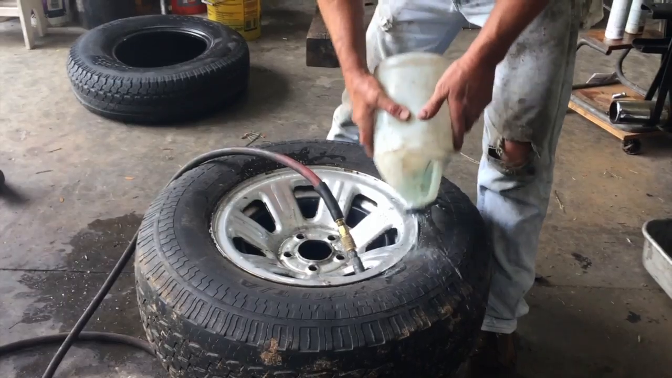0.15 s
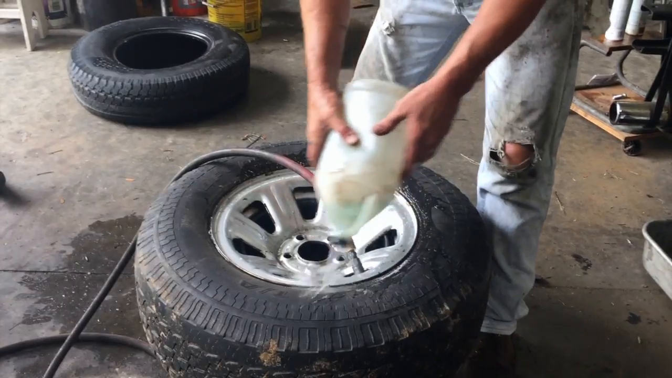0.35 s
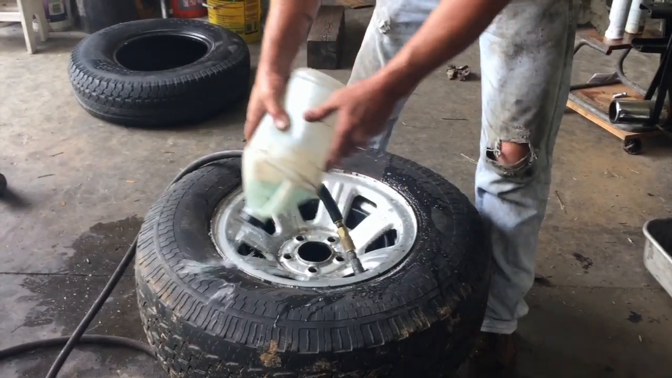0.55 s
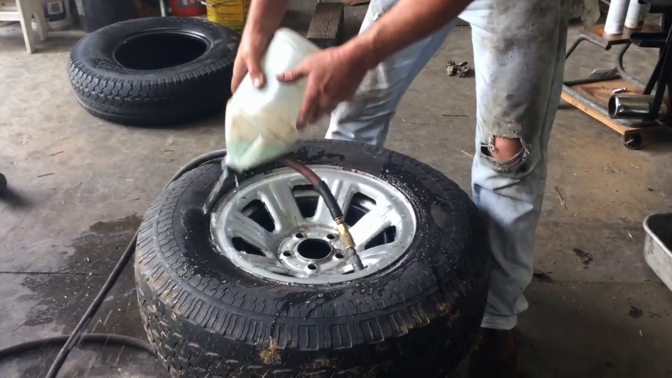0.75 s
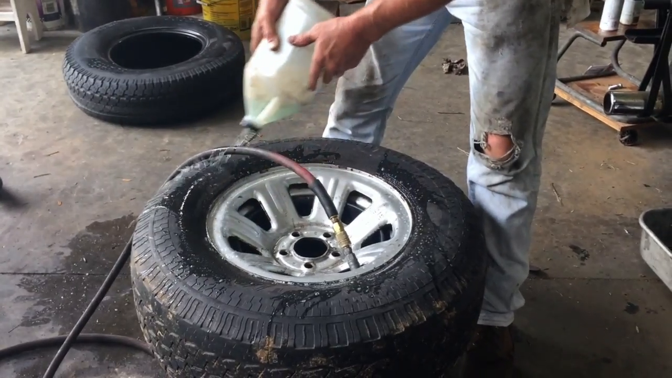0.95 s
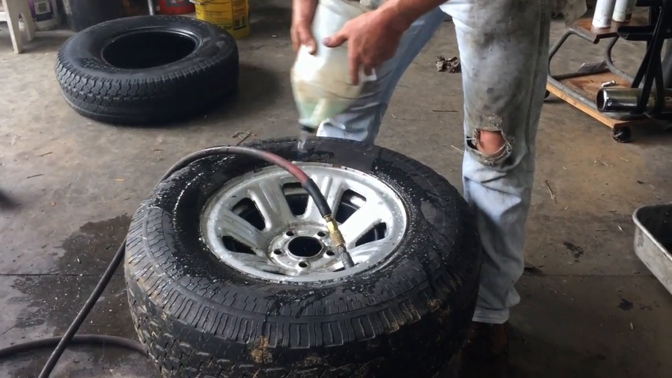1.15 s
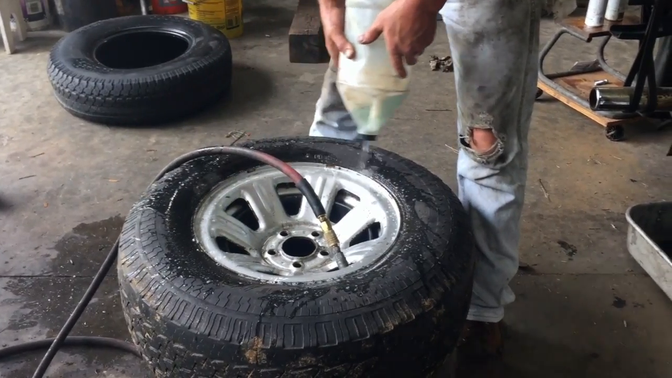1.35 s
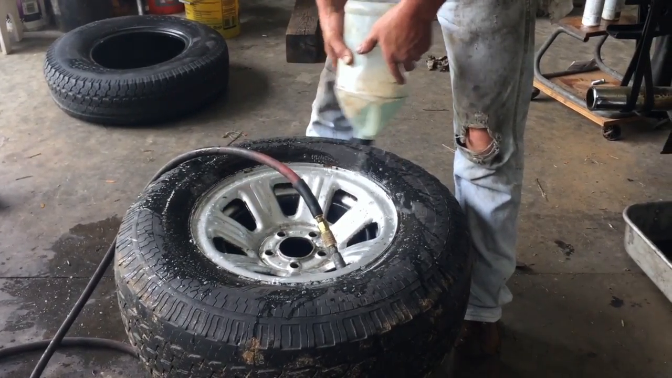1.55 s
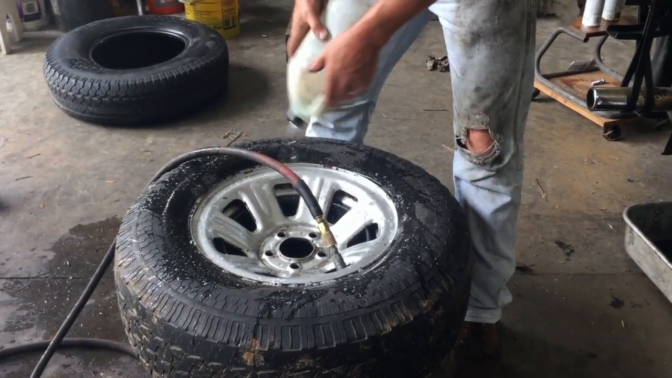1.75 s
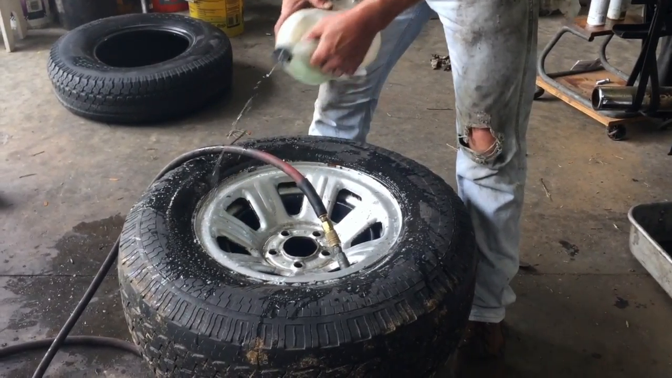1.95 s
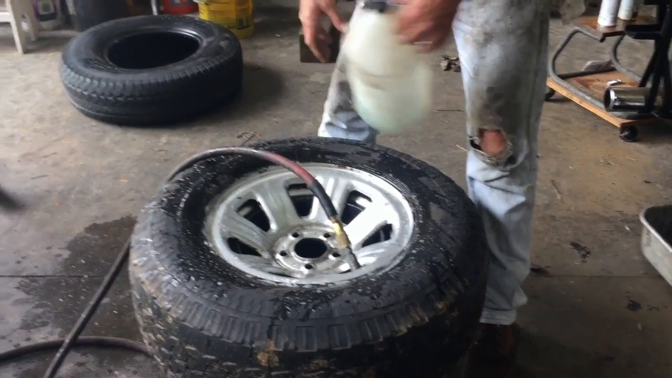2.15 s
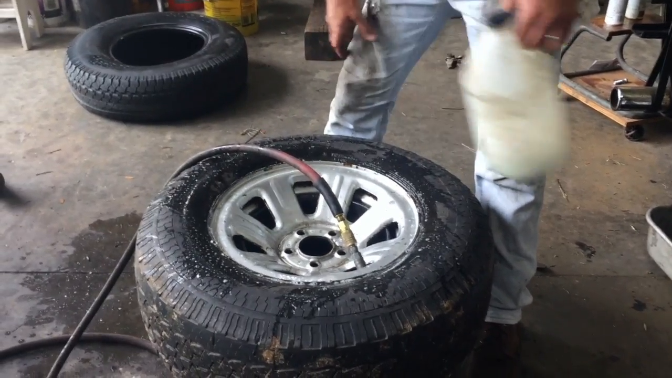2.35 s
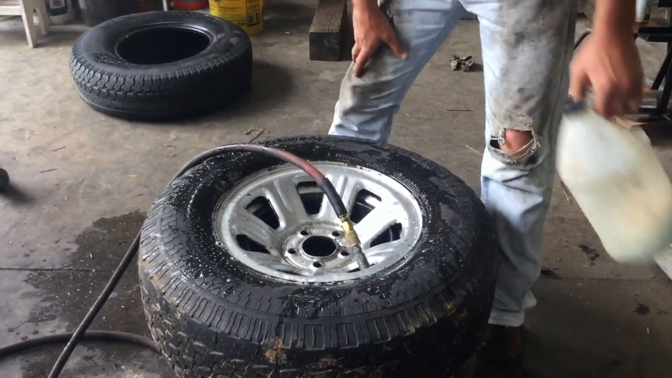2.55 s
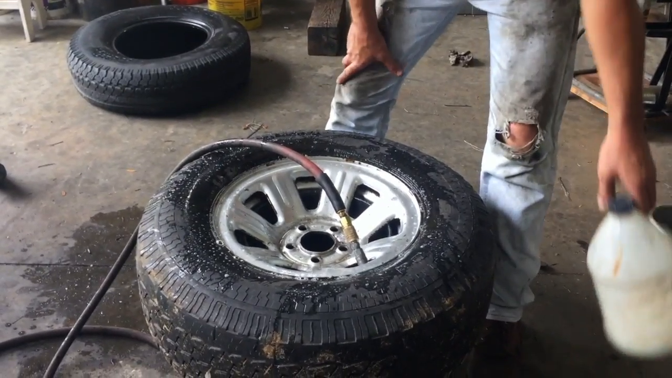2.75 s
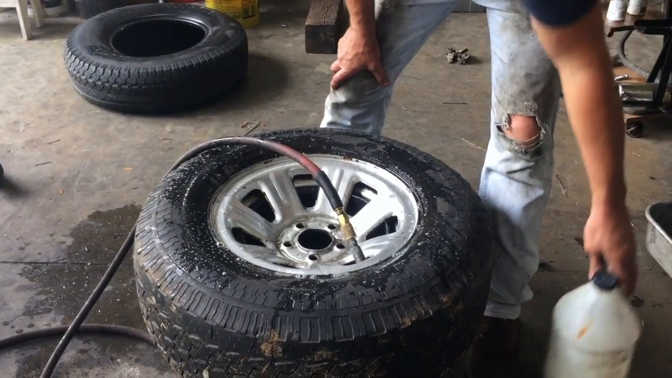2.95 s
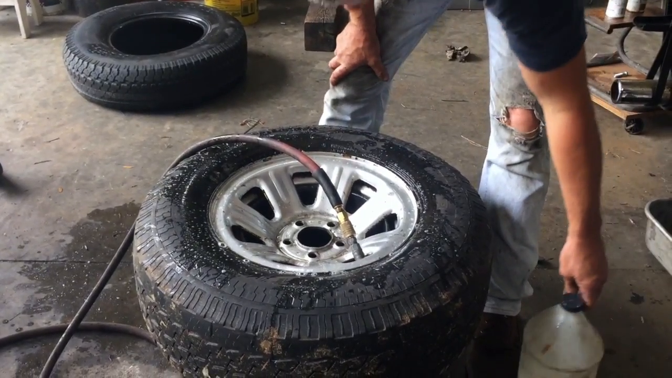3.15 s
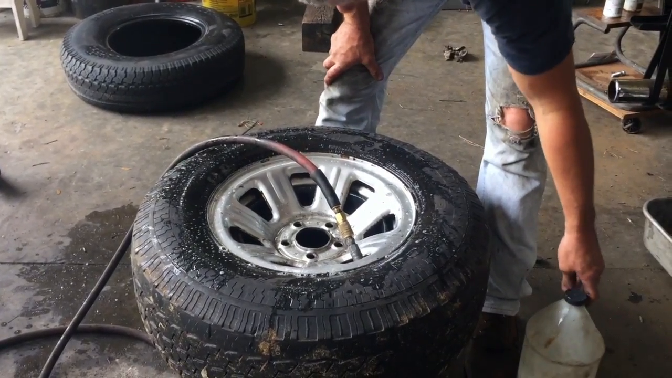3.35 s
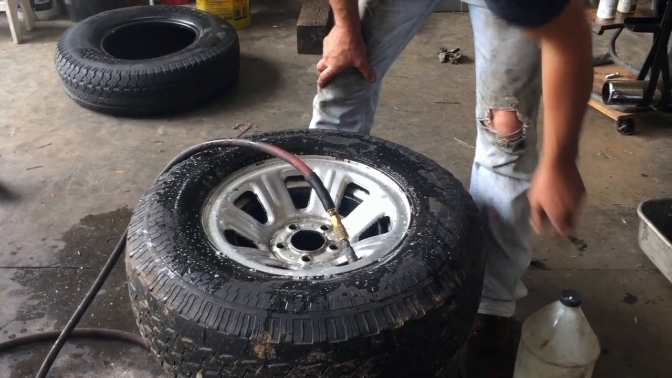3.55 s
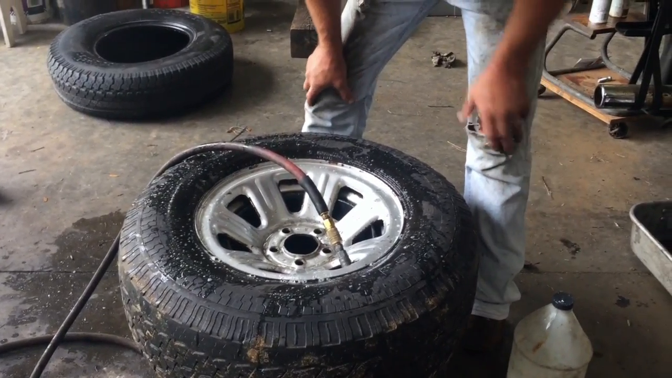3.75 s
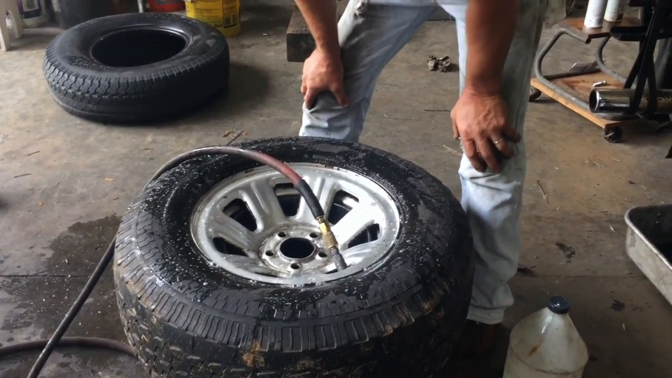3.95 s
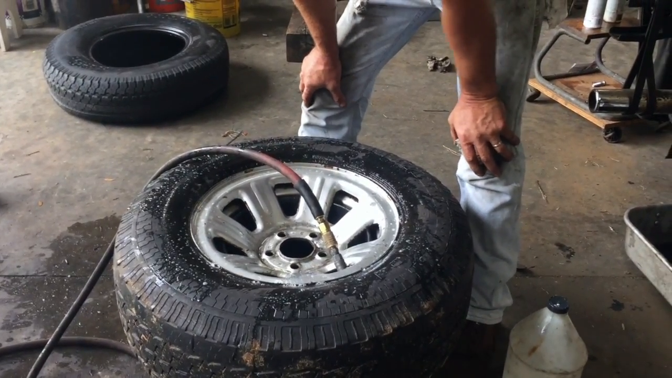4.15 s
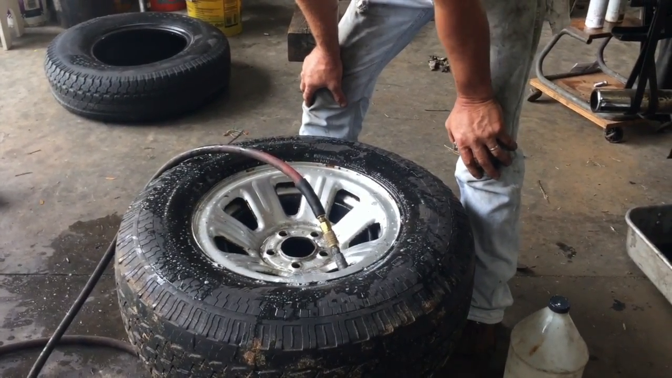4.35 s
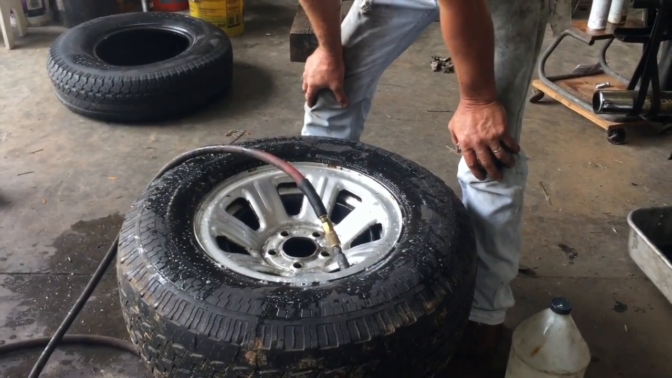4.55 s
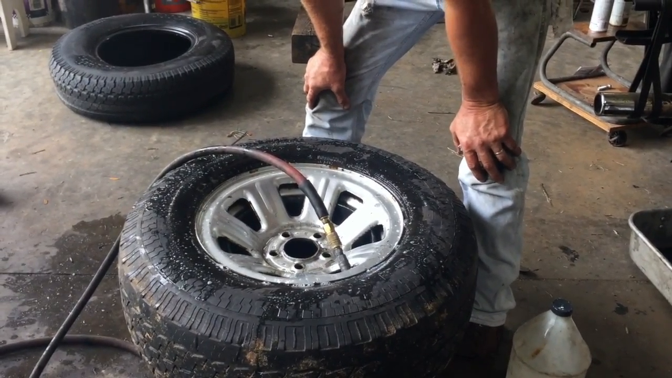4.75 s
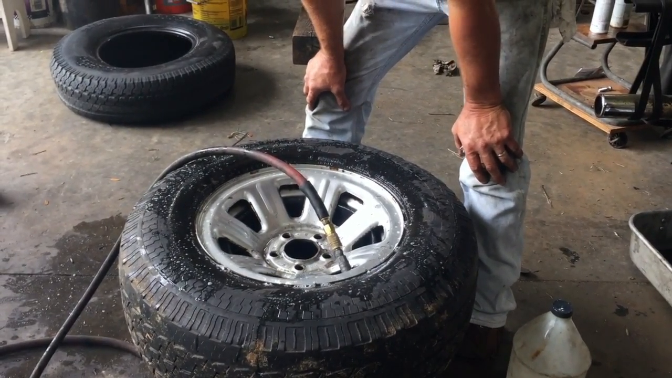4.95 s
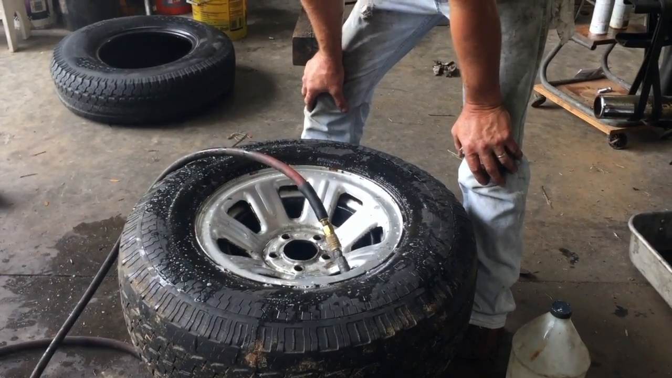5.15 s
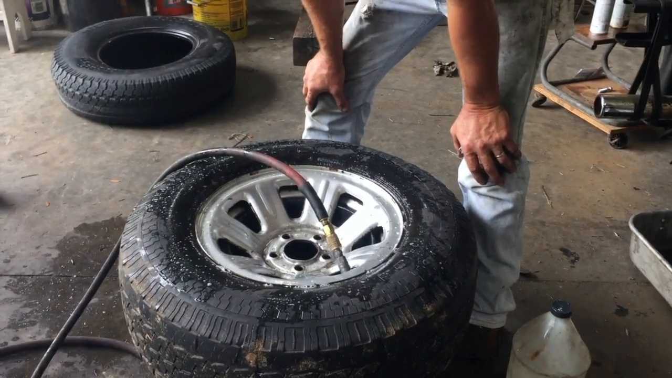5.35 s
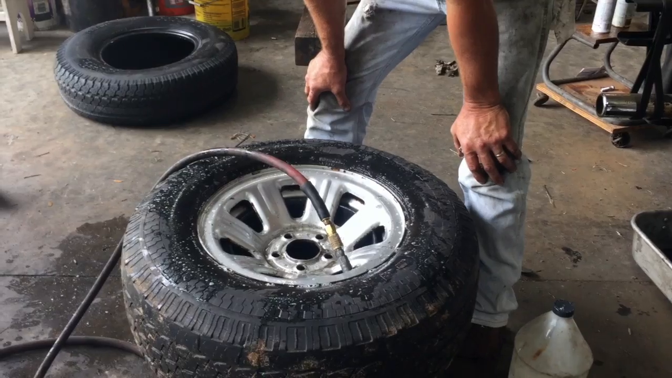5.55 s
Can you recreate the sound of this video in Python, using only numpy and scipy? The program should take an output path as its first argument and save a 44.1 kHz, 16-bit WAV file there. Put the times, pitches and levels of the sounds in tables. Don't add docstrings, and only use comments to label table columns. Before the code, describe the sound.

A dense, bright hiss of compressed air runs without pause for about 5.7 seconds, strong in the high treble and laced with thin, flickering metallic singing around 3 and 4 kHz. A breathy whistle near 7 kHz slides slowly down to about 6.5 kHz, and the level eases slightly. Beneath lie faint machinery hum and soft distant thuds. From 0 to 2.1 s, small wet sloshes of soapy water tick in a plastic jug, with a dull, hollow gulp at 0.77 s. At 2.2 s the jug wall buckles and springs back with a quick double pop and watery splash. At 3.28 s it lands on concrete: a hollow low knock with a sharp rim click, then a scrape, small rocking taps and settling until 3.5 s. Around 3.9 s a hand brushes and pats cloth; faint rustles and shuffles continue to the end. Short, dull room reverberation; one close microphone, practically mono.

```python
import sys
import numpy as np
from scipy import signal
from scipy.fft import rfft, irfft
from scipy.io import wavfile

SR = 44100
rng = np.random.default_rng(int(sys.argv[2]) if len(sys.argv) > 2 else 0)


def unload_wav(signal):
    wavfile.write(
        sys.argv[1],
        SR,
        np.round(np.clip(np.atleast_2d(signal).T, -1, 1) * 32767).astype(np.int16),
    )


def magnitude_from_level(level_db):
    exponent = np.asarray(level_db, float) / 20
    return 10 ** exponent


N = 251370

# f/Hz, density/dB per Hz
HUM_COLOUR = [(22, -25), (40, 0), (60, -9), (110, -2.5), (200, -1), (280, -3.5), (400, -4.5), (700, -13),
              (800, -32), (1300, -6), (2500, -57)]
# f/Hz, width/Hz, level over hum/dB
DRONES = [(60.7, 17.4, 13.8), (680, 9.1, 4.9), (983, 16, 8.9)]
# t/s, floor rumble level/dB, duct tone level/dB
THUDS = [(0.0, -62, -64), (0.24, -62.5, -70), (0.78, -61, -75), (1.05, -70, -79), (1.4, -71, -62),
         (1.6, -70, -64), (1.95, -73, -64), (2.1, -62.5, -75), (2.2, -59.5, -53), (2.28, -61, -68),
         (3.03, -83, -60.5), (3.3, -48.5, -58), (3.42, -70, -55.5), (3.52, -69, -63), (3.87, -62, -57),
         (4.03, -71, -60.5), (4.25, -76, -73), (4.41, -94, -66), (4.679, -71, -56.5), (4.75, -82, -59),
         (5.11, -85, -64), (5.36, -66.5, -87), (5.55, -64, -62), (5.68, -73, -73)]

# start t/s, level/dB, low f/Hz, high f/Hz, length/ms
SCUFFS = [(0.001, -63, 90, 396, 60), (0.76, -59, 910, 2200, 49), (2.085, -60, 94, 395, 200),
          (2.2, -60, 910, 2010, 113), (3.25, -54.5, 200, 1500, 17), (3.293, -56.5, 300, 3000, 160),
          (3.304, -57, 850, 2400, 12), (3.33, -47, 800, 2500, 21), (3.364, -48, 400, 2300, 10),
          (3.372, -62, 500, 2400, 9.5), (3.392, -63, 900, 2800, 12), (3.417, -51.5, 700, 2000, 16.5),
          (3.428, -50.5, 1000, 2500, 24), (3.835, -54.5, 400, 2200, 105), (3.893, -49, 2050, 2930, 60),
          (3.905, -56, 300, 1800, 53), (4.22, -67.5, 300, 1400, 88), (4.69, -60, 300, 1700, 22),
          (4.72, -66, 300, 1400, 33), (5.045, -64, 300, 1200, 30), (5.066, -64, 300, 1600, 24),
          (5.46, -65, 300, 1600, 16), (2.45, -63.5, 400, 1100, 62), (2.93, -66.5, 400, 1700, 150),
          (5.43, -73, 200, 1000, 74)]
# t/s, peak level/dB, centre f/Hz, t60/s
TICKS = [(3.862, -59, 704, 0.057), (3.865, -69, 265, .1), (3.88, -55, 450, 0.061),
         (3.92, -47, 2650, 0.06), (4.004, -49, 340, 0.036), (4.275, -61, 1260, 0.057),
         (4.335, -60, 466, .09), (4.65, -64, 756, .1), (4.695, -59, 860, 0.045), (4.728, -63, 800, .05),
         (5.014, -64, 684, 0.06), (5.02, -60, 308, 0.12), (5.03, -57, 1700, .06), (5.07, -58, 1450, .06),
         (5.204, -58.5, 820, .06), (5.235, -62, 700, .05), (5.318, -58, 660, 0.039),
         (5.32, -62, 1160, .06), (5.345, -65, 1340, .06), (5.44, -59, 620, 0.064),
         (5.46, -53, 600, 0.048), (0.068, -52.5, 205, 0.22), (0.873, -51, 170, 0.087),
         (0.99, -61, 326, 0.22)]
# t/s, peak level/dB, centre f/Hz, t60/s
SLOSH = [(0.11, -44.5, 650, 0.05), (0.195, -59.5, 696, 0.16), (0.443, -55, 570, 0.062),
         (0.532, -60, 392, 0.15), (0.533, -54, 1680, .06), (0.705, -53, 1370, 0.13),
         (0.977, -57, 706, 0.09), (1.018, -55.5, 1320, 0.11), (1.211, -59.5, 425, 0.091),
         (1.507, -59.5, 600, 0.075), (1.629, -52, 570, 0.063), (1.901, -53.5, 510, 0.08),
         (1.924, -57.5, 1150, 0.089), (1.955, -53.5, 300, 0.083), (2.038, -53, 1650, 0.057),
         (2.077, -56.5, 1060, 0.14), (2.086, -48, 280, 0.12), (2.206, -47, 1110, 0.037),
         (2.222, -51, 1630, 0.053), (2.258, -35, 1140, 0.027), (2.296, -58, 1268, 0.11),
         (2.465, -51.5, 533, 0.054), (2.515, -59, 616, 0.077), (2.643, -60.5, 624, 0.17),
         (2.719, -62, 460, 0.099), (2.994, -59, 850, 0.075), (3.049, -54, 685, 0.051),
         (3.229, -67, 312, 0.1)]

# f/Hz, level/dB, t60/s
GULP_MODES = [(90, -6, 0.13), (151.7, -6, 0.25), (230.4, 3.5, 0.18), (300, 4, 0.06), (373, 9, 0.04),
              (470, -2, 0.04), (600, -4, 0.04), (1080, -12, .04), (1690, -3, 0.04)]
# f/Hz, level/dB, t60/s
POP_MODES = [(200, -4, 0.071), (265, -14, 0.06), (326, -5, 0.06), (416, 7.5, 0.062), (479, -11, 0.08),
             (540, -7, 0.051), (780, -17, 0.04), (984, -4.5, 0.03)]
# f/Hz, level/dB, t60/s
BACK_MODES = [(247, 5.5, 0.038), (450, -6, 0.033), (162, -16, 0.046)]
# f/Hz, level/dB, t60/s
BASE_MODES = [(81, -5, 0.24), (110, -6.5, 0.25), (155, -12, 0.11), (198, -7.5, 0.24), (265, -10, 0.055),
              (332, -9, 0.12), (398, -1, 0.024), (600, -3, 0.035), (63, -9.5, 0.35)]
# f/Hz, level/dB, t60/s
EDGE_MODES = [(850, -14, 0.11), (1033, -6.5, 0.043), (1283, 2.5, 0.034), (1376, 8.5, 0.012),
              (1700, -5, 0.012), (2200, -14, 0.011), (1500, 5.5, 0.017), (2030, -8, 0.031),
              (2440, 2, 0.0096), (2900, -7, 0.012)]
# t/s, level/dB, contact cut f/Hz
GULP_BLOWS = [
    (0.7678, -42, 1490),
    (0.779, -50, 400),
]
# t/s, level/dB, contact cut f/Hz
POP_BLOWS = [
    (2.1826, -31.5, 1210),
]
# t/s, level/dB, contact cut f/Hz
BACK_BLOWS = [
    (2.2045, -39, 700),
    (2.2085, -40, 600),
    (2.243, -48, 400),
    (2.253, -45, 400),
]
# t/s, level/dB, contact cut f/Hz
BASE_BLOWS = [
    (3.26, -37, 200),
    (3.284, -26, 900),
    (3.296, -34, 704),
    (3.365, -47, 600),
    (3.40, -59, 400),
    (3.513, -50.5, 300),
]
# t/s, level/dB, contact cut f/Hz
EDGE_TAPS = [
    (3.2833, -25, 3500),
    (3.2862, -40, 3000),
    (3.309, -42, 1600),
    (3.366, -51, 2500),
    (3.423, -52, 3000),
    (3.436, -52.5, 4000),
]

SINGING_HZ = (3043, 4262, 1362, 1508, 2320, 1908, 1695)
SINGING_REST_DB = (-68, -70, -86, -103, -72, -83, -99)
# t/s, level/dB, half length/s
LOW_FLARES = [(0.1, -64, 0.016), (0.19, -57, 0.016), (0.3, -62, .03), (0.43, -62, 0.02), (0.53, -72, .03),
              (0.72, -57, 0.022), (0.87, -58, 0.025), (1.05, -56, 0.019), (1.17, -71, 0.017),
              (1.28, -65, .03), (1.38, -61, 0.02), (1.56, -59, .025), (1.72, -59, 0.023),
              (1.84, -61, 0.042), (1.94, -58, 0.015), (2.07, -58, 0.033), (2.18, -57, .02),
              (2.3, -56, 0.025), (2.41, -63, .025), (2.54, -58, .02), (2.61, -59, 0.024),
              (2.71, -60, 0.027), (2.8, -64, 0.023), (2.97, -55, 0.017), (3.08, -65, 0.018),
              (3.17, -66, 0.013), (3.255, -51.5, 0.024), (3.5, -68, .04), (3.66, -62, .02),
              (3.73, -54.5, 0.02), (3.85, -63, .03), (3.99, -63, 0.027), (4.2, -57.5, 0.059),
              (4.38, -67, .02), (4.47, -63, .015), (4.55, -66, .03), (4.66, -56, 0.02), (4.9, -69, .03),
              (5.02, -54, 0.016), (5.12, -68, .03), (5.4, -68, 0.029), (5.55, -60, 0.027),
              (5.65, -57.5, 0.036)]
# t/s, level/dB, half length/s
HIGH_FLARES = [(0.07, -72, .04), (0.2, -58, 0.035), (0.33, -59, 0.022), (0.55, -67, .025),
               (0.77, -58, 0.046), (0.94, -73, .03), (1.1, -74, 0.054), (1.75, -74, .05),
               (2.28, -65, 0.025), (2.47, -65, 0.03), (2.66, -60, 0.018), (2.77, -61, .025),
               (2.92, -62, 0.045), (3.03, -61, 0.015), (3.17, -54.5, 0.05), (3.31, -61, .02),
               (3.45, -66, 0.035), (3.58, -60, 0.023), (3.73, -54.5, 0.031), (4.05, -87, 0.059),
               (4.17, -60.5, 0.054), (4.33, -66, .02), (4.5, -60, 0.045), (4.66, -55, 0.022),
               (4.91, -55, 0.057), (5.26, -68, .02), (5.62, -66, 0.07)]
# t/s, level/dB, half length/s
HOSE_FLARES = [(0.92, -70.5, 0.061), (1.1, -77, 0.029), (1.35, -81, 0.074), (2.2, -82, 0.24),
               (2.8, -78, 0.46)]
# t/s, level/dB, half length/s
LATE_FLARES = [(4.3, -77.5, 0.39), (4.9, -75, 0.024), (5.15, -74, 0.088), (5.5, -79, 0.18)]
# t/s, level/dB, half length/s
SPOKE_FLARES = [(0.05, -74, 0.036), (0.14, -80, 0.017), (0.28, -65, .035), (0.46, -59, .02),
                (1.0, -65, 0.03), (1.25, -67, 0.045), (1.45, -57.5, 0.042), (1.65, -58, 0.023),
                (1.92, -75, .02), (2.4, -63, 0.026), (2.84, -61, 0.033), (3.13, -61, 0.03),
                (3.42, -64, 0.028), (3.68, -68, .02), (3.92, -58.5, 0.033), (4.1, -58, 0.03),
                (4.27, -61, 0.033), (4.46, -64, 0.028), (4.56, -63, 0.04), (4.72, -58.5, 0.018),
                (5.4, -61, 0.055), (5.5, -76, .04)]
# t/s, level/dB, half length/s
HUB_FLARES = [(0.22, -72, 0.03), (3.8, -66.5, 0.035), (4.25, -77, 0.052), (4.7, -70, 0.039),
              (5.4, -69, 0.047), (5.55, -77, .05)]
# t/s, level/dB, half length/s
STEM_FLARES = [(0.3, -88, 0.027), (0.54, -69, 0.016), (0.68, -73, 0.1), (0.93, -76, .05),
               (4.85, -75, 0.045)]

# t/s, valve whistle f/Hz, level/dB
JET = [
    (0.0, 7100, -40),
    (0.49, 7070, -42),
    (1.0, 6960, -41.5),
    (3.19, 6840, -42.5),
    (4.89, 6550, -43),
    (5.7, 6460, -43),
]
# f/Hz, density/dB per Hz
JET_COLOUR = [(700, -16), (1500, -17), (2000, -7.5), (2280, -3), (2620, -4.5), (3000, -3.5), (3800, -2),
              (4850, -3), (5800, -3.5), (7600, -1), (9800, 1), (10400, -4.5), (11300, -4.5), (15700, -4)]
# f/Hz, width/Hz, level over hiss/dB
WHEEL_MODES = [(1085, 8, 6), (1507, 6, 10), (1680, 15, 9), (1803, 20, 6), (1906, 6, 9), (2030, 6, 8),
               (2196, 31, 7), (2234, 10, 9), (2320, 6, 12), (2347, 10, 12), (2428, 10, 12), (2525, 6, 10),
               (2700, 42, 5), (2762, 10, 8), (2826, 10, 12), (2966, 26, 6), (3075, 25, 11), (3252, 6, 10),
               (3300, 6, 11), (3370, 15, 7), (3461, 10, 7), (3564, 20, 8), (3698, 6, 10), (3768, 20, 6),
               (3892, 31, 3), (3115, 20, 7), (4097, 6, 6), (5250, 40, 1), (5345, 20, 5), (2893, 15, 7),
               (5561, 15, 7), (5787, 37, 7), (5820, 6, 15), (5916, 10, 7), (5992, 10, 5), (6094, 15, 9),
             (6218, 15, 6), (6282, 26, 6), (6352, 10, 8), (6481, 25, 3), (6578, 20, 6), (6655, 12, 4),
             (6705, 40, 7), (6853, 15, 5), (6918, 15, 6), (7020, 10, 8), (7192, 10, 7), (7246, 50, 2),
             (7300, 37, 3), (7343, 50, 2), (7397, 20, 4), (7596, 47, 2), (7747, 6, 12), (7870, 10, 8),
             (8048, 26, 4), (8306, 31, 5), (8500, 20, 5), (8753, 15, 4), (8802, 20, 5), (9259, 10, 3)]
# f/Hz, width/Hz, level over hiss/dB
CHUCK_MODES = [(8130, 120, 2), (8230, 40, 2), (8600, 120, 3), (8950, 100, 1), (9260, 60, 1), (9350, 80, 1),
               (9620, 80, 0), (9800, 250, 0), (10080, 40, 0), (10190, 50, 1), (10730, 70, 1),
               (10940, 50, 2), (11280, 250, 4), (11620, 150, 3), (12330, 400, 4), (13020, 150, 0),
               (13380, 100, 0), (13790, 150, 0), (14070, 90, 3), (14390, 100, 0), (14590, 100, 2),
               (14700, 50, 3), (15020, 100, -1), (15220, 150, 0), (15550, 80, 2), (4170, 60, 1),
               (4700, 60, 0), (5400, 60, 1), (5960, 60, 2), (7795, 40, 2), (3025, 20, 8), (2150, 60, -1)]
# f/Hz, width/Hz, depth/dB
NULLS = [(2635, 60, 6), (4480, 200, 2), (2885, 40, 3), (1990, 60, 3), (4850, 130, 5), (5170, 80, 3),
         (9150, 120, 3), (9490, 90, 3), (10450, 160, 5), (12880, 120, 4), (13950, 90, 3), (14170, 80, 5),
         (14810, 130, 6), (15400, 150, 2)]
# f/Hz, trend/dB per s, waver/dB
ZONES = [(700, -.5, 1.0), (1700, -0.9, 1.2), (2570, 0.2, .7), (4000, 0.2, .8), (7040, 0.34, 0.3),
         (9650, 0.5, .8), (11000, 0.9, 1.2), (14000, 0.6, .4)]

# t/s, low f/Hz, high f/Hz, level/dB
SPLITS = [(0.592, 14500, 15900, -66), (0.755, 6200, 9000, -49), (0.94, 11700, 13800, -60),
          (2.102, 8200, 9700, -56), (3.03, 11000, 13100, -59), (3.495, 10300, 12500, -58),
          (3.635, 14500, 15900, -64)]


def rms_one(x):
    return x / np.sqrt(np.mean(x ** 2) + 1e-20)


def lowpass(x, cut_hz):
    return signal.sosfilt(signal.butter(2, min(cut_hz, 0.45 * SR), fs=SR, output="sos"), x)


def band(x, low_hz, high_hz):
    return signal.sosfilt(signal.butter(2, [low_hz, min(high_hz, 0.45 * SR)], "band", fs=SR, output="sos"), x)


def drift(rate_hz):
    r = np.exp(-80 * np.pi * rate_hz / SR)
    slow = signal.lfilter([1], [1, -2 * r, r * r], rng.standard_normal(N // 40 + 2002))
    slow = rms_one(slow[2000:])
    return np.interp(np.arange(N) / 40, np.arange(len(slow)), slow)


def swell(start_s, length_s):
    share = (np.arange(N) / SR - start_s) / length_s
    return np.sin(np.pi * share) * (share > 0) * (share < 1)


def surges(times_s, levels_db, rest_db, rise_s, fall_s):
    lag_s = np.arange(0, N + 160, 160)[:, None] / SR - np.array(times_s)
    bells = np.exp(-0.5 * (lag_s / np.where(lag_s < 0, rise_s, fall_s)) ** 2) * magnitude_from_level(np.array(levels_db))
    gain = magnitude_from_level(rest_db) + bells.sum(axis=1)
    return np.interp(np.arange(N) / 160, np.arange(len(lag_s)), gain)


def singing_noise(colour, modes, lift_db, ripple, ripple_t60_s):
    hz = np.maximum(np.arange(N // 2 + 1) * SR / N, 1)
    colour_hz, colour_db = np.transpose(colour)
    t = np.arange(SR // 2) / SR
    tail = rng.standard_normal(len(t)) * magnitude_from_level(-60 * t / ripple_t60_s)
    tail = tail / np.sqrt(np.sum(tail ** 2))
    depth = ripple / (1 + (hz / 18000) ** 2)
    diffuse = np.abs(1 + depth * rfft(tail, N)) ** 2 / (1 + ripple ** 2)
    peaks = sum(magnitude_from_level(db + lift_db) ** 2 / (1 + (2 * (hz - mode_hz) / width_hz) ** 2) ** 1.24
                for mode_hz, width_hz, db in modes)
    gain = magnitude_from_level(np.interp(np.log(hz), np.log(colour_hz), colour_db, left=-80))
    return irfft(rfft(rng.standard_normal(N)) * gain * np.sqrt(diffuse + peaks), N)


def workshop():
    s, rumble_db, duct_db = np.transpose(THUDS)
    hum = rms_one(singing_noise(HUM_COLOUR, DRONES, lift_db=7.0, ripple=0.61, ripple_t60_s=0.39))
    hum = hum * magnitude_from_level(-65.5 + 0.094 * drift(27) + 0.1 * drift(23))
    rumble = rms_one(band(rng.standard_normal(N), 24, 190))
    rumble = rumble * surges(s, rumble_db, rest_db=-82.5, rise_s=0.037, fall_s=0.073)
    duct_hz = 170 + 6.17 * drift(6.5)
    duct = np.sqrt(2) * np.sin(2 * np.pi * np.cumsum(duct_hz) / SR)
    duct = duct * surges(s, duct_db, rest_db=-88, rise_s=0.017, fall_s=0.017)
    return hum + rumble + duct


def room(x):
    t60_s, level_db = 0.25, -22.5
    t = np.arange(SR // 2) / SR
    tail = band(rng.standard_normal(len(t)), 72, 1800) * magnitude_from_level(-60 * t / t60_s) * (t > 0.008)
    return magnitude_from_level(level_db) * signal.fftconvolve(x, tail / np.sqrt(np.sum(tail ** 2)))[:N]


def scuffs():
    grit = rng.standard_normal(N) * magnitude_from_level(2.5 * drift(120) + 2.2 * drift(200))
    return sum(magnitude_from_level(db) * swell(s, length_ms / 1000) * rms_one(band(grit, low_hz, high_hz))
               for s, db, low_hz, high_hz, length_ms in SCUFFS)


def slosh_and_ticks():
    octaves, rise_s = 0.84, 0.0006
    puffs, span = SLOSH + TICKS, SR // 4
    out = np.zeros(N + SR)
    t = np.arange(span) / SR
    for s, db, hz, t60_s in puffs:
        spread = 2 ** (octaves / 2 * min(1, 520 / hz))
        low_hz, high_hz = hz / spread, hz * spread
        steep = band(band(rng.standard_normal(span), low_hz, high_hz), low_hz, high_hz)
        puff = rms_one(steep) * (1 - np.exp(-t / rise_s)) * magnitude_from_level(-60 * t / t60_s)
        start = round(s * SR)
        out[start:start + span] += magnitude_from_level(db + 0.5) * puff
    return out[:N]


def struck(blows, modes, rise_s):
    out, span = np.zeros(N), SR // 2
    t = np.arange(span) / SR
    for s, db, cut_hz in blows:
        rings = np.zeros(span)
        for i, (hz, mode_db, t60_s) in enumerate(modes):
            luck_db = 1.5 * rng.standard_normal()
            rings += (-1) ** i * magnitude_from_level(mode_db + luck_db - 60 * t / t60_s) * np.sin(2 * np.pi * hz * t)
        start = round(s * SR)
        out[start:start + span] += magnitude_from_level(db) * lowpass(rings, cut_hz) * (1 - np.exp(-t / rise_s))
    return out


def jug_body():
    gulp = struck(GULP_BLOWS, GULP_MODES, rise_s=0.0018)
    pop = struck(POP_BLOWS, POP_MODES, rise_s=0.003)
    back = struck(BACK_BLOWS, BACK_MODES, rise_s=0.0018)
    landing = struck(BASE_BLOWS, BASE_MODES, rise_s=0.00018)
    return gulp + pop + back + landing


def jug_edge():
    return struck(EDGE_TAPS, EDGE_MODES, rise_s=0.00018)


def singing_wheel():
    out = np.zeros(N)
    tables = (LOW_FLARES, HIGH_FLARES, HOSE_FLARES, LATE_FLARES, SPOKE_FLARES, HUB_FLARES, STEM_FLARES)
    for hz, rest_db, flares in zip(SINGING_HZ, SINGING_REST_DB, tables):
        s, db, half_s = np.transpose(flares)
        phase = 2 * np.pi * np.cumsum(hz * (1 + 0.002955 * drift(22.3))) / SR
        height = surges(s, db, rest_db, half_s, half_s) * magnitude_from_level(2.6 * drift(40))
        out += np.sqrt(2) * height * np.sin(phase)
    return out


def valve_whistle(x, centre_hz, width_hz):
    r, out, state = np.exp(-np.pi * width_hz / SR), np.zeros(N), np.zeros(2)
    b = np.array([1, 0, -1]) * (1 - r * r) / 2
    for i in range(0, N, 512):
        a = [1, -2 * r * np.cos(2 * np.pi * centre_hz[i] / SR), r * r]
        out[i:i + 512], state = signal.lfilter(b, a, x[i:i + 512], zi=state)
    return out


def filling_tire(hiss):
    hz = np.arange(N // 2 + 1) * SR / N + 1
    t = np.arange(N) / SR
    spectrum = rfft(hiss)
    for null_hz, width_hz, depth_db in NULLS:
        spectrum = spectrum * magnitude_from_level(-depth_db / (1 + (2 * (hz - null_hz) / width_hz) ** 2))
    log_centres = np.log(np.array(ZONES)[:, 0])
    out = np.zeros(N)
    for pick, (_, slope_db, waver_db) in zip(np.eye(len(ZONES)), ZONES):
        share = np.interp(np.log(hz), log_centres, pick)
        out += irfft(spectrum * share, N) * magnitude_from_level(slope_db * (t - t.mean()) + waver_db * drift(7.8))
    return out


def air_jet():
    s, whistle_hz, jet_db = np.transpose(JET)
    t = np.arange(N) / SR
    modes = WHEEL_MODES + CHUCK_MODES
    hiss = singing_noise(JET_COLOUR, modes, lift_db=2.5, ripple=0.55, ripple_t60_s=0.3)
    hiss = hiss + magnitude_from_level(7.6) * valve_whistle(hiss, np.interp(t, s, whistle_hz), width_hz=530)
    level_db = np.interp(t, s, jet_db) - 0.65 + 0.15 * drift(26)
    return rms_one(filling_tire(hiss)) * magnitude_from_level(level_db)


def scene():
    jug = jug_body() + slosh_and_ticks()
    edge = jug_edge()
    echo = room(jug + magnitude_from_level(-2.5) * edge)
    mono = workshop() + scuffs() + jug + edge + echo + singing_wheel() + air_jet()
    return np.array([mono, mono])


def top_cut(x):
    return signal.sosfilt(signal.butter(12, 16580, fs=SR, output="sos"), x)


def record(dry):
    low_cut_hz, top_cut_hz = 53.5, 15760
    white = rng.standard_normal(N)
    side = np.zeros(N)
    for s, low_hz, high_hz, db in SPLITS:
        hiss = band(band(white, low_hz, high_hz), low_hz, high_hz)
        side += magnitude_from_level(db) * swell(s - 0.023, 0.045) * rms_one(hiss)
    x = dry + side * [[1], [-1]]
    x = signal.sosfilt(signal.butter(4, low_cut_hz, "high", fs=SR, output="sos"), x)
    x = signal.sosfilt(signal.ellip(14, 0.3, 80, top_cut_hz, fs=SR, output="sos"), x)
    return top_cut(x)


dry = scene()
out = record(dry)
unload_wav(out)
```